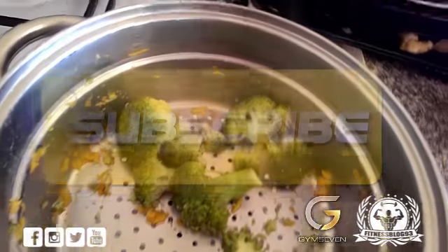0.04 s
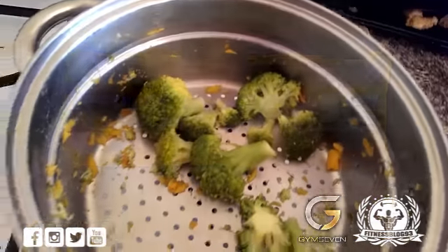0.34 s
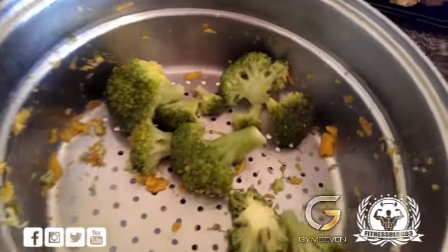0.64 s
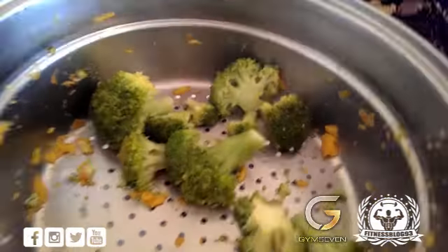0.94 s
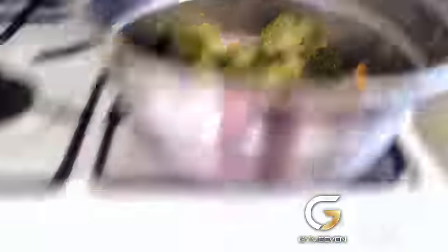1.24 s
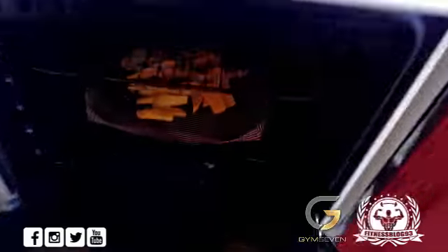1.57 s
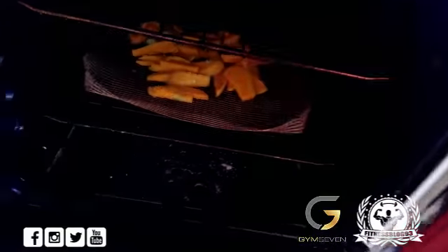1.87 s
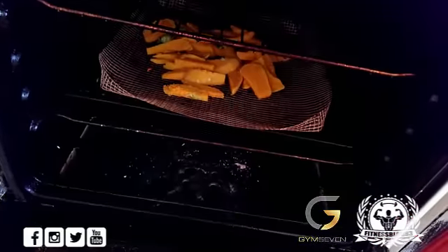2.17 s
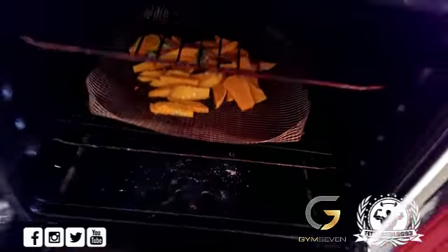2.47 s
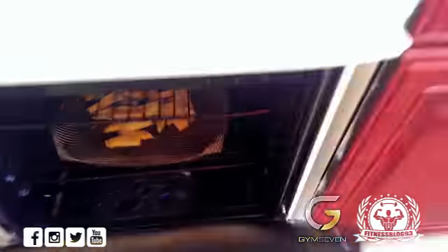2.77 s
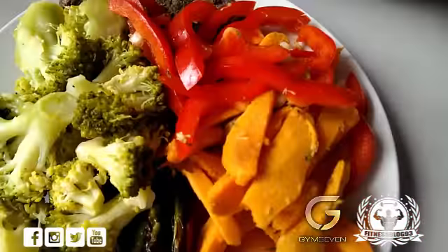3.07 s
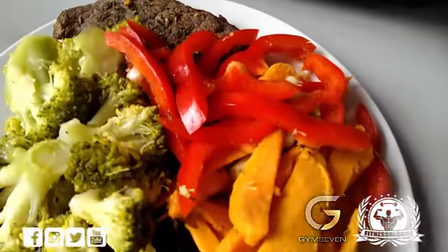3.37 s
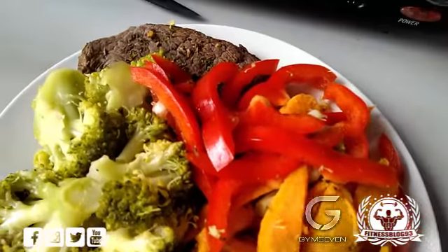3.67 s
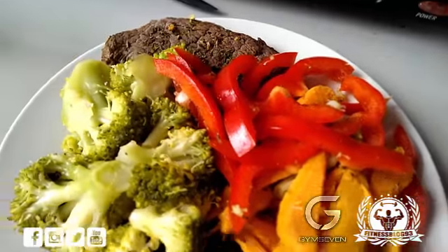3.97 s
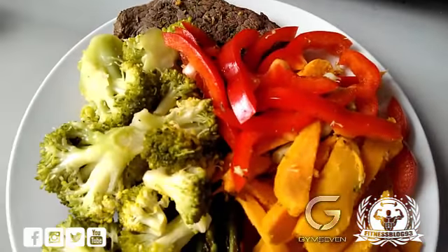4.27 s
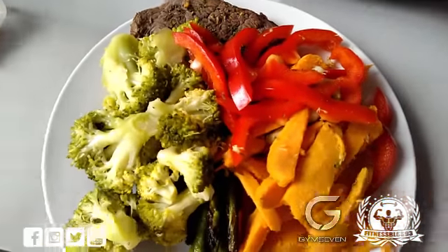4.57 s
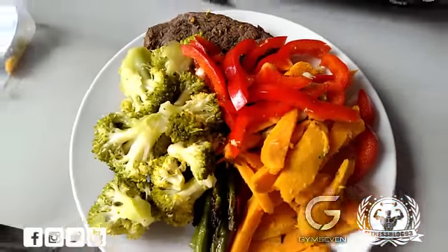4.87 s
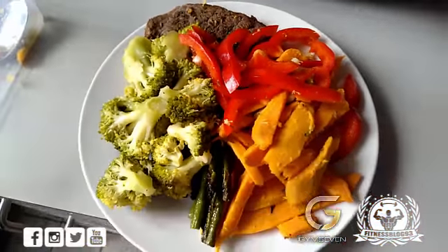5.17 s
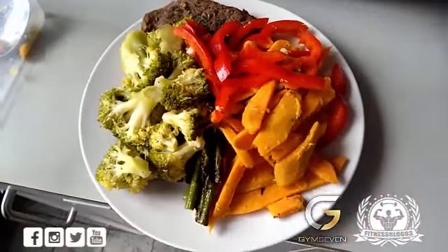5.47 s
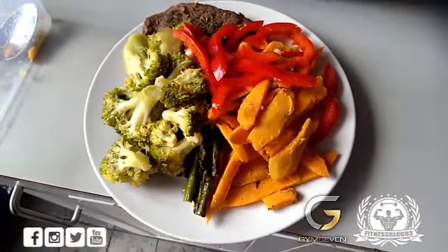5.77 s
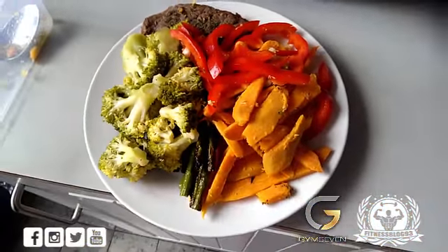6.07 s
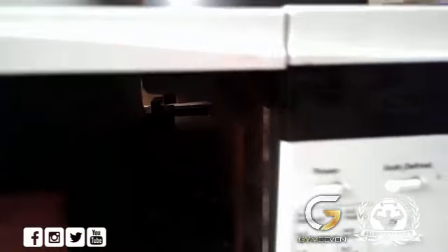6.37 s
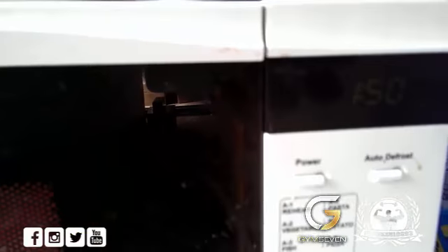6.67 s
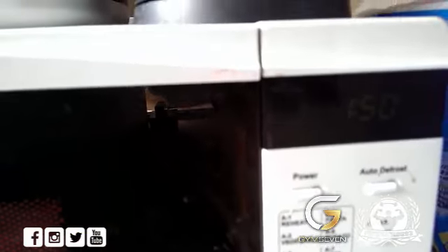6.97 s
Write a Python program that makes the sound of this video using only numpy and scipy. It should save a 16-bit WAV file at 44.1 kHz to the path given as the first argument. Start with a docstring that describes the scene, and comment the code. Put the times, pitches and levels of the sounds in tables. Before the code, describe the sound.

Vegetables sizzle and spit in a steel pot, an oven hisses with a few knocks, then a microwave buzzes and hums.

```python
"""Broccoli sizzles and spits in a steel steamer over a gas flame: bubbles burst, droplets pop, the pot rings.
The microphone swings down to the open, hissing oven, with knocks and low thumps of air. Then a microwave
oven runs: from across the worktop, its fan shaking the cabinet into a buzz and whines; then close up,
with mains hum and rushing air. The stove is heard at once and cuts off; each microwave passage fades in."""
import sys
import numpy as np
from scipy import signal
from scipy.fft import rfft, irfft
from scipy.io import wavfile

SR = 44100
rng = np.random.default_rng(int(sys.argv[2]) if len(sys.argv) > 2 else 0)


def materialize(psi):
    """Save the field psi as 16-bit PCM at rate SR to the path in sys.argv[1].

    A 1-D psi becomes a single channel; in a 2-D psi each row is a channel.
    """
    bounded = np.clip(np.atleast_2d(psi).T, -1, 1)
    quanta = np.round(bounded * 32767).astype(np.int16)
    wavfile.write(sys.argv[1], SR, quanta)


N = 319284
T = np.arange(N) / SR
EVENT_T = T[:SR // 2]
FREQS = np.maximum(np.arange(N // 2 + 1) * SR / N, 1)
FAR_START_S, NEAR_START_S = 2.93, 6.235
FAN_HZ = 45.785


def undb(db):
    """Decibels to gain."""
    return 10 ** (np.asarray(db) / 20)


def level(x, db):
    """Set the rms level."""
    return x * undb(db) / np.sqrt(np.mean(x ** 2))


def curve(rows, column=1):
    """One column of a time table, sample by sample."""
    rows = np.array(rows)
    return np.interp(T, rows[:, 0], rows[:, column])


def colour(x, points, column=1):
    """Filter by a spectrum of (Hz, dB) points."""
    points = np.array(points)
    gain_db = np.interp(np.log(FREQS), np.log(points[:, 0]), points[:, column])
    return irfft(rfft(x) * undb(gain_db), N)


def resonances(hz, modes):
    """Gain at hz of a set of (Hz, width in Hz, dB) modes."""
    return np.sqrt(sum(undb(db) ** 2 / (1 + ((hz ** 2 - centre ** 2) / (hz * width)) ** 2) ** 2.97
                       for centre, width, db in modes))


def ringing(x, modes):
    """Response of (Hz, width in Hz, dB) modes driven by x."""
    return sum(undb(db) * signal.lfilter(*signal.iirpeak(hz, hz / width, fs=SR), x)
               for hz, width, db in modes)


def noise():
    """White noise."""
    return rng.standard_normal(N)


def walk(rate_hz):
    """Random wander about zero, rate_hz steps a second."""
    steps = rng.standard_normal(1024)
    return 0.58 * np.interp(T * rate_hz, np.arange(len(steps)), steps)


def decay(t60):
    """Exponential decay, half a second long."""
    return np.exp(-np.log(1000) * EVENT_T / max(t60, .001))


def add(track, start_s, sound):
    """Mix a sound into a track."""
    start = int(max(start_s, 0) * SR)
    track[start:start + len(sound)] += sound[:N - start]


def reflections(x, t60):
    """Diffuse tail from nearby surfaces."""
    tail = rng.standard_normal(len(EVENT_T)) * decay(t60)
    return signal.fftconvolve(x, tail / np.linalg.norm(tail))[:N]


def burst_power(per_s, spread_db, max_spreads, power_shape):
    """Power envelope of randomly timed bursts of random size."""
    sizes = undb(spread_db * np.minimum(rng.exponential(size=N), max_spreads))
    bursts = (rng.random(N) < per_s / SR) * sizes
    return np.abs(signal.fftconvolve(bursts ** 2, power_shape)[:N])


def crackle(per_s, spread_db, hiss_db):
    """Tiny bubbles burst, each a puff of noise with a faint echo, over a smooth hiss."""
    bubble = decay(t60=.001) ** 2 + 0.15 * decay(t60=0.13) ** 2
    power = burst_power(per_s, spread_db, max_spreads=5, power_shape=bubble)
    return noise() * np.sqrt(power / power.mean() + undb(hiss_db) ** 2)


def spits():
    """Small droplets tick at random."""
    power = burst_power(per_s=28, spread_db=3, max_spreads=2, power_shape=decay(t60=0.0068) ** 2)
    return noise() * np.sqrt(power)


# Each row: time in seconds, bright crackle gain in dB, body gain in dB.
SIZZLE_GAINS = [(0.0, -42.5, -54.5), (0.68, -46, -57.5), (0.735, -46, -55.5), (0.82, -44, -57.5),
                (0.99, -45, -53.5), (1.12, -41.5, -48), (1.38, -44, -53), (1.65, -50, -55),
                (2.2, -50.5, -61), (2.89, -52.5, -57.5)]
# Each row of both: frequency in Hz, gain in dB.
BRIGHT_SPECTRUM = [(1800, -19), (3000, -1), (4000, 0), (6000, -0.5), (8500, -1), (10500, -3), (12000, -0.5),
                   (13000, 3), (14200, 2), (15800, -3)]
BODY_SPECTRUM = [(150, -11), (300, -0.5), (480, -2), (700, -3.5), (870, -1), (1100, -1.5), (1480, 3),
                 (1700, 1), (2100, 2), (2600, 0.5), (3100, 0.5), (3600, -11), (5000, -27.5)]
def sizzle():
    """Water and fat sizzle on hot steel, near in the pot, then farther off in the oven."""
    bright = level(colour(crackle(per_s=2200, spread_db=2.5, hiss_db=-6.5), BRIGHT_SPECTRUM), -0.22)
    bright += level(colour(spits(), BRIGHT_SPECTRUM), -10.5)
    body = level(colour(crackle(per_s=2000, spread_db=12, hiss_db=25), BODY_SPECTRUM), 0.81)
    bright_rise_db, body_rise_db = spurts()
    bright_db = curve(SIZZLE_GAINS) + bright_rise_db + 0.31 * walk(17)
    body_db = curve(SIZZLE_GAINS, column=2) + body_rise_db + 2.2 * walk(21.72)
    return bright * undb(bright_db) + body * undb(body_db)


# Each row: frequency in Hz, width in Hz, gain in dB.
POT_MODES = [(955, 74, -5), (1486, 50, -10.5), (2630, 130, -9.5), (3080, 68, -3), (3970, 62, -13.5),
             (4580, 100, -9.5), (5750, 220, -14)]
def pot(x, gone_s=1.48, leave_s=0.18):
    """The steel pot adds its ring until the microphone swings away."""
    over_pot = np.clip((gone_s - T) / leave_s, 0, 1)
    return x + over_pot * ringing(x, POT_MODES)


# Each row: time in seconds, gain in dB.
BURNER_GAINS = [(0.0, -66.5), (0.75, -63), (1.25, -58), (2.0, -58), (2.35, -61), (2.89, -56.5)]
# Each row: frequency in Hz, gain in dB.
BURNER_SPECTRUM = [(15, -5), (35, -18), (65, 3.5), (100, -0.5), (150, -2.5), (200, -4), (400, -30),
                   (900, -68.5)]
def burners(flutter_hz=21, flutter_db=4.5):
    """Gas flames flutter with a low roar, louder as the microphone passes."""
    roar = level(colour(noise(), BURNER_SPECTRUM), 0.87)
    return roar * undb(curve(BURNER_GAINS) + flutter_db * walk(flutter_hz))


# Each row: start in seconds, relative level in dB, ring in Hz, fizz t60 in seconds,
# fizz over crack in dB, ring over fizz in dB.
DROPLET_POPS = [(0.136, -31, 4230, 0.03, -4, 6), (0.164, -31, 12500, .012, -4, 3),
                (.204, -40, 6200, .01, -8, 8), (.225, -33, 4000, .012, -6, 0),
                (.261, -22, 4800, .02, -4, 6), (.318, -35, 4020, 0.023, 1, 18),
                (.3305, -43, 8000, .01, -9, 3), (.369, -35.5, 7860, 0.008, 9, 18),
                (.387, -29.5, 12000, 0.018, 2, 7), (.425, -29.5, 3300, .014, -2, 14),
                (.452, -31, 12000, .012, -1, 1), (.491, -31, 3500, 0.018, 1, 3),
                (.4995, -23.5, 13800, .014, -2, 1), (0.5097, -28.5, 6400, .08, -8, 10),
                (0.547, -27, 4800, .022, -4, 3), (.5755, -25.5, 7000, 0.0074, -7, 2),
                (.638, -29, 12600, 0.0086, 0, 21), (0.646, -34, 12600, 0.009, -6.5, 9),
                (0.689, -33, 13900, 0.02, 4, 14), (0.7453, -21.5, 11500, 0.022, -6, 8),
                (0.751, -25.5, 12600, 0.0059, 3, 22), (0.777, -26.5, 2660, 0.018, 4, 12.5),
                (0.7779, -35.5, 2820, .016, 3, -1), (.901, -28, 12000, 0.017, -6, 1),
                (0.9693, -31.5, 14000, 0.014, 4, 19), (1.118, -38.5, 2750, .023, -3, 8),
                (1.152, -30, 3200, 0.029, 12, 11), (1.247, -35, 13700, .012, 0, 11),
                (1.413, -30.5, 13660, 0.095, 7, -11), (2.285, -39.5, 9600, .018, 4, 16),
                (2.639, -41, 4600, .13, 4, 9)]
def pops(ring_q=9, grain_db=2.5):
    """Larger droplets burst with a dry crack and a grainy, ringing fizz, echoed by the pot; the last two rows
    are brief spurts of hiss in the oven."""
    track = np.zeros(N)
    for start_s, db, hz, t60, fizz_db, ring_db in DROPLET_POPS:
        crack, fizz, grain = rng.standard_normal((3, len(EVENT_T)))
        fizz *= undb(grain_db * grain)
        fizz += undb(ring_db) * signal.lfilter(*signal.iirpeak(hz, ring_q, fs=SR), fizz)
        burst = 3 * (EVENT_T == 0) + crack * decay(t60=.001) + undb(fizz_db) * fizz * decay(t60)
        add(track, start_s, undb(db + 6) * burst / np.abs(burst).max())
    track = colour(track, [(200, -22), (900, -8), (1800, 0), (16000, 0)])
    return track + undb(-7) * reflections(track, t60=.1)


# Each row: start in seconds, tone level in dB, tone in Hz, tone rise in seconds, tone t60 in seconds,
# relative noise gain in dB, noise t60 in seconds.
KNOCKS_AND_THUMPS = [(0.529, -51.5, 152.5, .002, 0.67, -5, 0.46), (1.058, -40, 66, .02, 0.37, -18, .05),
                     (1.414, -35.5, 390, .006, 0.13, -8, 0.23),
                     (1.431, -33, 162, 0.0018, 0.056, -12.5, 0.16),
                     (1.482, -44.5, 385, .003, .16, -7, 0.36), (1.599, -53, 113, .002, 0.061, 1, .1),
                     (1.675, -52.5, 320, 0.0022, 0.08, 4.5, 0.34),
                     (1.728, -26.5, 208.6, 0.032, 0.18, -29, .16), (1.789, -45, 215, .01, .6, -16, 0.11),
                     (1.868, -46.5, 331, .004, 0.33, -9, 0.15), (1.907, -41, 113, .002, .2, -1, 0.19),
                     (2.033, -37, 108, 0.0011, 0.034, -34, .028),
                     (2.164, -44, 125, .0015, .083, -25, 0.041), (2.486, -59, 348, .0015, 0.099, 3.5, 0.38),
                     (2.561, -53, 896, .0015, 0.17, -7.5, 0.32), (2.737, -49, 290, 0.0018, .1, -4.5, .12),
                     (2.766, -45, 107, .003, 0.21, -10.5, .1), (2.7865, -45, 292, 0.0012, 0.05, 1.5, .06),
                     (2.797, -43.5, 201, 0.0017, .25, -0.5, 0.093)]
# Each row: frequency in Hz, gain in dB.
DULL_SPECTRUM = [(60, -35.5), (200, 6.5), (450, 6), (900, 1.5), (1800, -2), (4000, -37), (12000, -53)]
def knocks_and_thumps():
    """Knocks on stove and oven, and low thumps of air on the microphone: a tone and dull noise each."""
    rings, bursts = np.zeros(N), np.zeros(N)
    for start_s, db, hz, rise_s, t60, noise_db, noise_t60 in KNOCKS_AND_THUMPS:
        envelope = decay(t60) * (1 - np.exp(-EVENT_T / rise_s))
        add(rings, start_s, undb(db) * np.sin(2 * np.pi * hz * EVENT_T) * envelope)
        onset = 6 * (EVENT_T == 0)
        tail = rng.standard_normal(len(EVENT_T)) * decay(noise_t60)
        add(bursts, start_s, undb(db + noise_db) * (onset + tail))
    return rings + 2.74 * colour(bursts, DULL_SPECTRUM)


# Each row: start in seconds, length in seconds, bright crackle rise in dB, body rise in dB.
WATER_SPURTS = [(0.766, 0.046, 5.5, 7), (1.31, 0.045, 2, 6.5), (1.539, 0.077, 3.5, 2), (1.707, 0.11, 3, 0),
                (1.845, 0.089, 4, -1), (2.115, 0.065, 1, 5), (2.285, 0.032, 3.5, 4.5),
                (2.371, 0.06, 4.5, 6), (2.557, 0.023, 0, 7.5), (2.779, 0.1, 5.5, 3)]
def spurts(attack_s=0.005, release_s=0.028):
    """Water meets hot metal: the sizzle flares, holds and dies back."""
    bright_db, body_db = np.zeros(N), np.zeros(N)
    for start_s, length_s, bright_rise_db, body_rise_db in WATER_SPURTS:
        age_s = T - start_s
        flare = np.clip(np.minimum(age_s / attack_s, 1 - (age_s - length_s) / release_s), 0, 1)
        bright_db += bright_rise_db * flare
        body_db += body_rise_db * flare
    return bright_db, body_db


# Each row: frequency in Hz, width in Hz, gain in dB.
STEEL_MODES = [(2110, 230, -7), (2670, 540, 0.5), (5600, 570, -2), (7000, 910, -3), (8550, 1400, -3),
               (13000, 1900, -1)]
def snap(start_s=1.0182):
    """Hot steel ticks once, with a thin ring and echoes inside the pot."""
    tick = np.zeros(N)
    add(tick, start_s, undb([3]))
    ring = ringing(tick + undb(-.5) * reflections(tick, t60=0.065), STEEL_MODES)
    return colour(ring + undb(-17) * tick, [(300, -18), (1200, -9), (1700, -1), (14000, -3), (16000, -4)])


def tones(rows, waver_db):
    """(Hz, dB) tones waver as the microphone drifts through standing waves."""
    return sum(np.sqrt(2) * undb(db + waver_db * walk(8.9)) * np.sin(2 * np.pi * (hz * T + rng.random()))
               for hz, db in rows)


# Each row: frequency in Hz, level in dB, drift in dB per second.
FAR_HUM = [(91.8, -55.5, 0), (138.1, -62, -0.8), (229.8, -73, -3), (276, -67.5, -1.3), (298.4, -63, 0.3),
           (319, -66, -2.5), (413.5, -77.5, -4), (460.5, -77, 10), (552.4, -72.5, -2.5), (594, -68.5, 0),
           (639, -72, 0), (693, -75, -1.5), (1010, -75, -3), (1106, -80, -1)]
def far_hum(drift_s, rough_per_hz=.0008):
    """Fan and transformer hum; the motor runs roughly, so higher tones tremble more."""
    return sum(tones([(hz, db)], waver_db=2) * undb(db_per_s * drift_s)
               * (1 + rough_per_hz * hz * walk(45)) for hz, db, db_per_s in FAR_HUM)


def whine(order, db, wander_rad=.4, ragged=.22):
    """A panel sings at a multiple of the fan rate, unsteady in pitch and level."""
    phase = 2 * np.pi * order * FAN_HZ * T + wander_rad * (walk(4) + .5 * walk(22))
    return np.sqrt(2) * undb(db) * (1 + ragged * walk(FAN_HZ)) * np.cos(phase)


LOW_ORDER, HIGH_ORDER = 47, 49
# Each row: fan order, far level in dB, far drift in dB per second, near level in dB.
PANEL_WHINES = [(31, -75, 9, -83), (32, -80, -6, -69), (33, -70, -2, -69.5), (34, -61, 3.5, -75),
                (35, -82, -7, -73), (45, -70, -1, -65), (46, -91.5, 6, -60.5), (48, -62.5, 1, -76)]
# Each row of both: time in seconds, level in dB.
LOW_WHINE_LEVELS = [(3.05, -61), (3.25, -57), (3.36, -63), (3.56, -57), (3.62, -71), (3.8, -67),
                    (3.88, -54.5), (4.1, -58), (4.22, -72), (4.28, -55), (4.39, -60.5), (4.45, -81),
                    (4.9, -68), (5.02, -59.5), (5.2, -52), (5.29, -63), (5.42, -56), (5.5, -65),
                    (5.67, -50.5), (5.82, -64), (5.88, -56), (6.03, -60), (6.2, -60)]
HIGH_WHINE_LEVELS = [(3.05, -59), (3.25, -52), (3.42, -70), (4.1, -93), (4.4, -67), (4.85, -83),
                     (5.35, -71), (5.7, -65), (6.2, -72)]
def far_whines(drift_s):
    """Panel whines trade places as the microphone drifts; two swell above the rest."""
    others = sum(whine(order, db + db_per_s * drift_s) for order, db, db_per_s, _ in PANEL_WHINES)
    return others + whine(LOW_ORDER, curve(LOW_WHINE_LEVELS)) + whine(HIGH_ORDER, curve(HIGH_WHINE_LEVELS))


# Each row: frequency in Hz, width in Hz, gain in dB.
CABINET_MODES = [(1030, 73, -9.5), (1316, 57, -10.5), (1590, 180, -3.5), (1900, 60, -39), (2172, 200, -4.5),
                 (2490, 230, -12), (3193, 85, -12), (4180, 1300, -19.5)]
def buzz(panel_db, scatter_rad, unsteady):
    """The fan shakes the cabinet once a turn, no two turns quite alike."""
    orders = np.arange(1, 140)
    whining = [row[0] for row in PANEL_WHINES] + [LOW_ORDER, HIGH_ORDER]
    gains = undb(panel_db) * resonances(orders * FAN_HZ, CABINET_MODES) * ~np.isin(orders, whining)
    size = 4096
    position = (T * FAN_HZ % 1) * size

    def turns(spread_rad):
        """One turn, repeated; reflections scatter the phases of its partials."""
        phases = spread_rad * rng.standard_normal(len(gains))
        shape = irfft(np.r_[0, gains * np.exp(1j * phases)], size)
        return np.interp(position, np.arange(size), shape * size / np.sqrt(2))
    return turns(scatter_rad) + unsteady * (walk(3.5) * turns(np.pi) + walk(30) * turns(np.pi))


# Each row: frequency in Hz, width in Hz, gain in dB.
LOOSE_PANEL_MODES = [(1570, 220, -9), (2220, 310, 6)]
def rattle(db, sharpness):
    """A loose panel chatters once per fan turn."""
    chatter = np.exp(sharpness * np.cos(2 * np.pi * FAN_HZ * T)) * noise()
    return level(irfft(rfft(chatter) * resonances(FREQS, LOOSE_PANEL_MODES), N), db)


# Each row of both: frequency in Hz, gain in dB.
FAR_AIR_SPECTRUM = [(20, 3.5), (60, 0), (110, -3.5), (180, -1.5), (290, 1.5), (430, -6), (560, -7),
                    (800, -11), (1250, -5.5), (1800, -5.5), (2800, -11.5), (3700, -13), (4400, -15.5),
                    (5400, -20), (8500, -27.5), (13000, -30), (15000, -55)]
NEAR_AIR_SPECTRUM = [(20, -16), (60, -11), (100, -1.5), (190, 0), (270, -1), (350, 0), (450, -2),
                     (560, -10.5), (750, -11.5), (1300, -16), (1700, -7.5), (2300, -23), (2800, -17),
                     (4400, -27.5), (8500, -38), (13000, -40), (15000, -59)]
# Each row: frequency in Hz, width in Hz, gain in dB.
VENT_MODES = [(960, 140, -4.5), (1490, 130, 3.5), (2196, 450, 9), (3250, 450, -8), (4440, 700, -4),
              (6400, 2000, -12.5)]
def air(spectrum, air_db, vent_db):
    """Cooling air rushes through resonant vents."""
    vents = irfft(rfft(noise()) * resonances(FREQS, VENT_MODES), N)
    rush = level(colour(noise(), spectrum), air_db) * undb(.5 * walk(10))
    return rush + level(vents, vent_db)


# Each row: frequency in Hz, share of the buzz that swells with the low whine in dB.
SWELL_BAND = [(1650, -34), (2000, -7)]
def microwave_far(buzz_follows=.35, approach_db_per_s=1):
    """Across the worktop the buzz leads, growing slowly as the microphone nears the cabinet."""
    mean_whine_db = np.mean([db for _, db in LOW_WHINE_LEVELS])
    swell = undb(buzz_follows * (curve(LOW_WHINE_LEVELS) - mean_whine_db))
    approach = undb(approach_db_per_s * (T - 6.3))
    drift_s = np.clip(T, FAR_START_S, NEAR_START_S) - 5.32
    cabinet = buzz(panel_db=-61, scatter_rad=1.4, unsteady=.28) + rattle(db=-67.5, sharpness=1.7)
    upper = colour(cabinet, SWELL_BAND)
    rush = air(FAR_AIR_SPECTRUM, air_db=-56, vent_db=-56.5) * approach ** 0.5
    return far_hum(drift_s) + far_whines(drift_s) + swell * upper + approach * (cabinet - upper) + rush


# Each row: frequency in Hz, level in dB.
THROB_TONES = [(45.785, -47), (137.35, -53), (183.1, -76.5), (320.5, -61)]
def throb(end_s=3.535, release_s=0.022):
    """A brief low vibration at the fan's shaft rate."""
    gate = (T > FAR_START_S) * np.clip(1 - (T - end_s) / release_s, 0, 1)
    return tones(THROB_TONES, waver_db=-8) * gate


# Each row: start in seconds, level in dB, contact in seconds.
FINGER_TAPS = [(3.5355, -35.5, 0.0024), (4.1311, -35, 0.0017), (4.6913, -34.5, 0.0014)]
def taps(highpass_hz=70):
    """A finger nudges the microphone's housing: soft pushes, no ring."""
    track = np.zeros(N)
    for start_s, db, contact_s in FINGER_TAPS:
        add(track, start_s, undb(db) * np.sin(np.pi * T[T < contact_s] / contact_s) ** 2)
    return signal.sosfilt(signal.butter(2, highpass_hz, "high", fs=SR, output="sos"), track)


# Each row: frequency in Hz, level in dB.
NEAR_HUM = [(45.8, -66), (91.57, -60), (100, -53), (137.35, -56), (147.5, -66.5), (166.3, -58),
            (200.2, -58), (251.2, -68), (300.4, -64), (332.5, -55), (378.5, -60), (500.6, -84), (1236, -74)]
def microwave_near():
    """At the door, mains hum and rushing air lead."""
    cabinet = buzz(panel_db=-59, scatter_rad=1.5, unsteady=.25) + rattle(db=-71, sharpness=1.3)
    whines = sum(whine(order, db) for order, _, _, db in PANEL_WHINES)
    whines += whine(LOW_ORDER, db=-64) + whine(HIGH_ORDER, db=-63)
    hum = tones(NEAR_HUM, waver_db=-1.5)
    return hum + cabinet + whines + air(NEAR_AIR_SPECTRUM, air_db=-46.5, vent_db=-55.5)


# Each row: frequency in Hz, left gain in dB, right gain in dB.
PORT_RESPONSE = [(60, 0, -.5), (130, 0, .3), (330, .5, 0), (600, 3.8, -1.5), (800, 5.5, -4.5),
                 (1100, 5.8, -7), (2100, 5.5, -5), (3000, 5.8, -10), (4500, 6, -15), (8000, 6, -19),
                 (14000, 6, -25)]
def ports(sound, lag_samples=19):
    """Two microphone ports; bass bends round late to the shaded right one, treble comes off the walls."""
    bent = colour(np.roll(sound, lag_samples), [(350, 0), (900, -10), (2500, -27), (6000, -20.5)])
    walls = colour(reflections(sound, t60=.4), [(100, -13), (350, -5.5), (900, 3), (2000, -1)])
    return colour(sound, PORT_RESPONSE), colour(bent + walls, PORT_RESPONSE, column=2)


def port_noise():
    """One port's own faint rumble and hiss."""
    spectrum = [(15, -39), (40, -42.5), (100, -44), (400, -66), (1500, -67), (12000, -66.5), (15000, -80.5)]
    return colour(noise(), spectrum)


# Each row: start in seconds, end in seconds. The first is already running.
PASSAGES = [(-1, 2.899), (2.974, 6.23), (6.24, 8)]
def fades(rise_s=0.3, cutoff_s=0.0044):
    """Between passages the sound dies at once, then rises linearly."""
    return sum(np.clip((T - start_s) / rise_s, 0, 1) * np.exp(-np.maximum(T - end_s, 0) / cutoff_s)
               for start_s, end_s in PASSAGES)


def scene():
    """Stove, far microwave, near microwave, in stereo; the throb is on the right only."""
    stove = pot(sizzle() + pops()) + snap() + burners()
    passage = np.searchsorted([FAR_START_S, NEAR_START_S], T)
    sound = np.choose(passage, [stove, microwave_far(), microwave_near()]) + knocks_and_thumps() + taps()
    left, right = ports(sound)
    right += throb()
    return np.array([left + port_noise(), right + port_noise()]) * fades()


def record(dry, top_hz=15850):
    """A steep low-pass removes the highest treble."""
    return signal.sosfilt(signal.ellip(10, .2, 70, top_hz, fs=SR, output="sos"), dry)


dry = scene()
out = record(dry)
materialize(out)
```